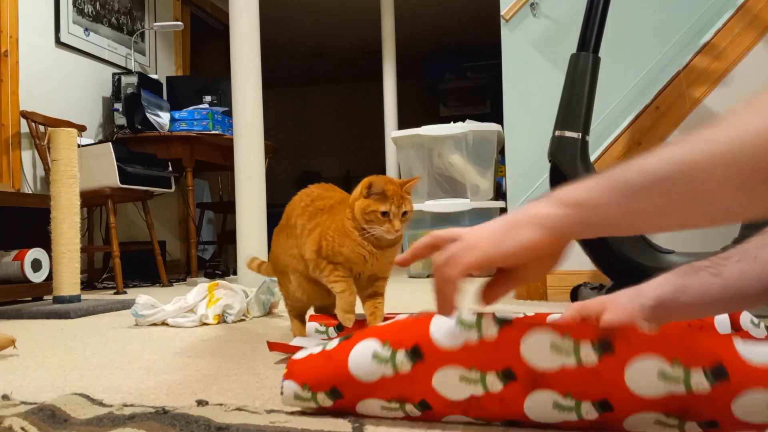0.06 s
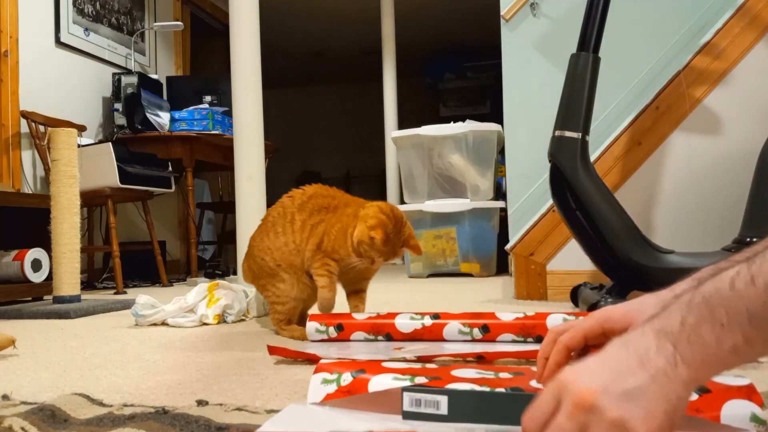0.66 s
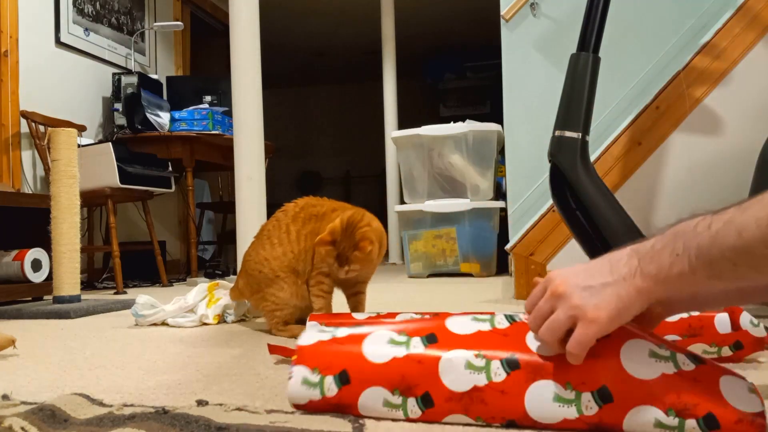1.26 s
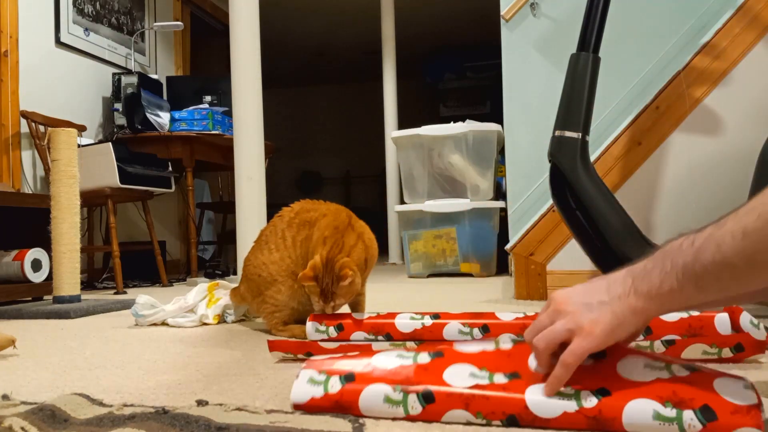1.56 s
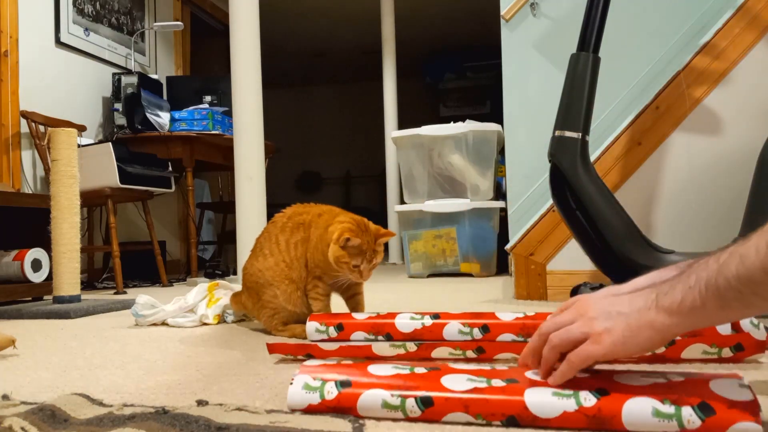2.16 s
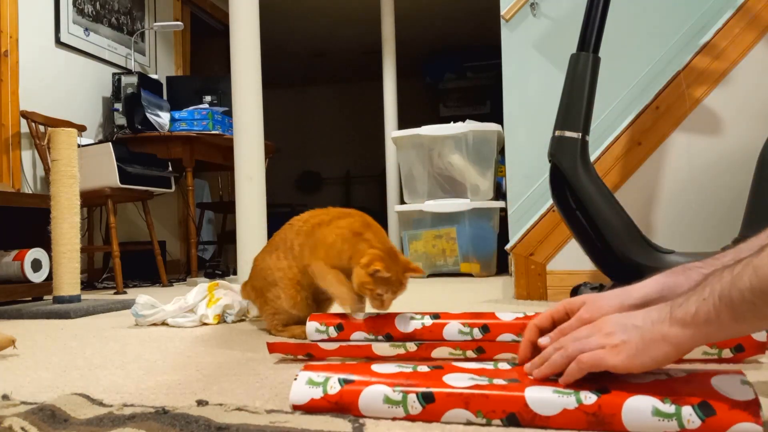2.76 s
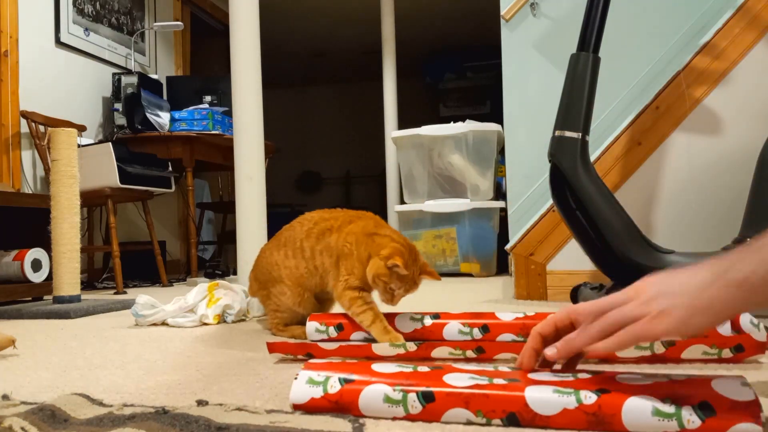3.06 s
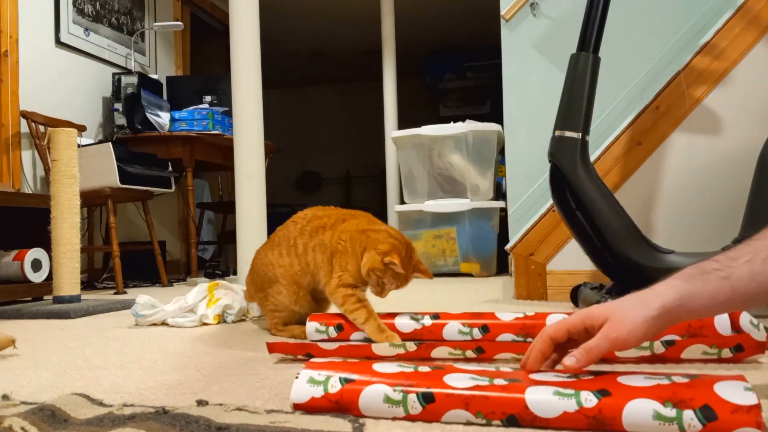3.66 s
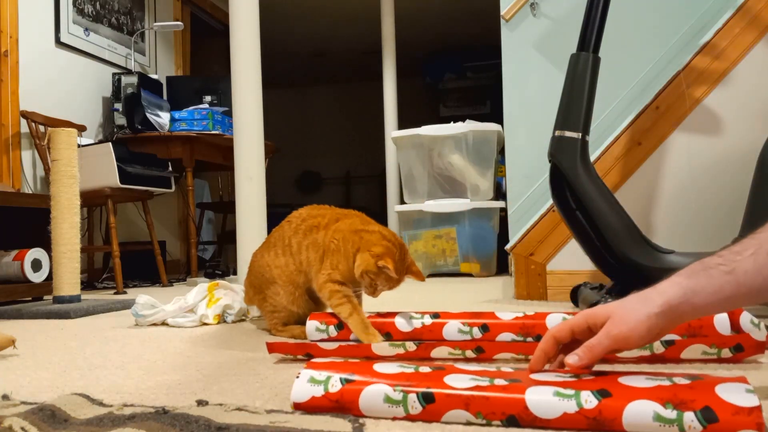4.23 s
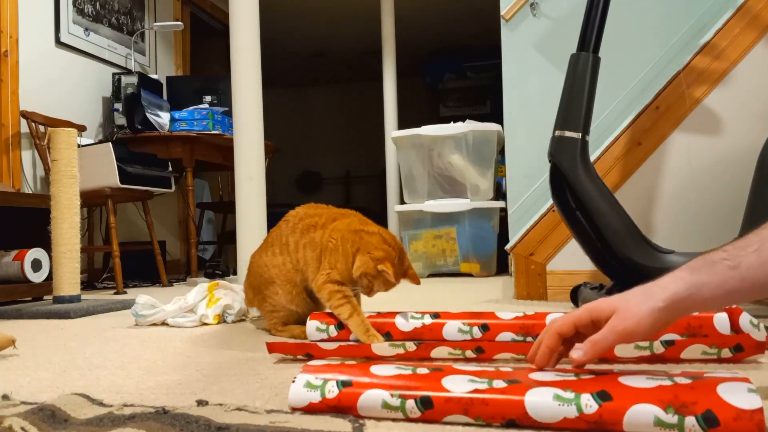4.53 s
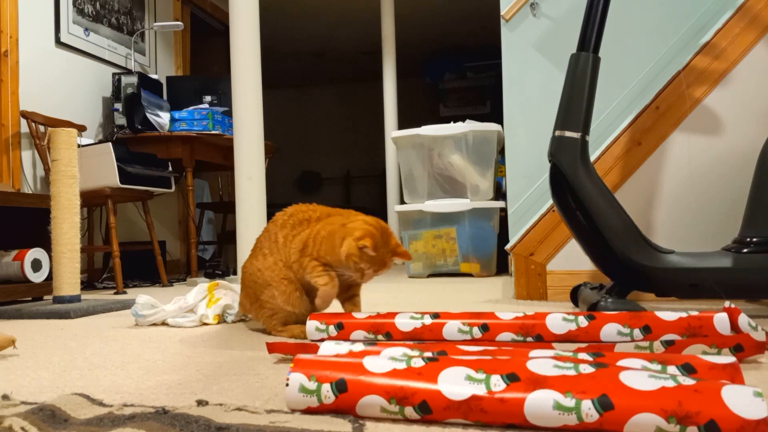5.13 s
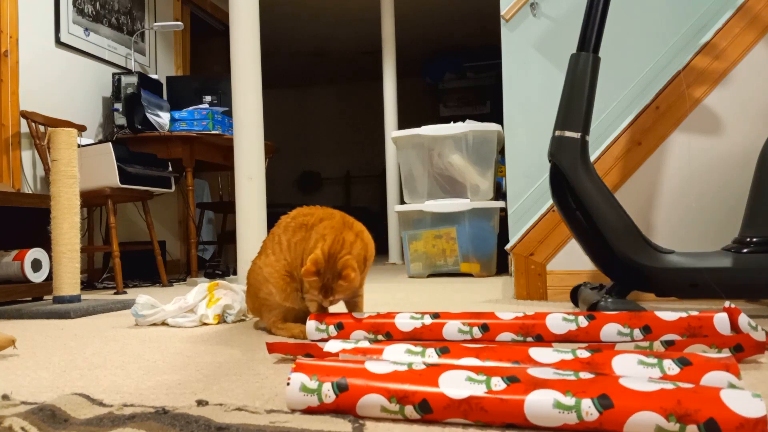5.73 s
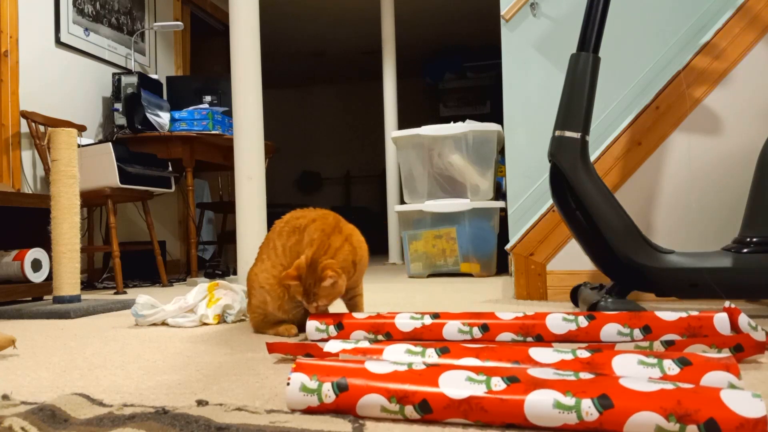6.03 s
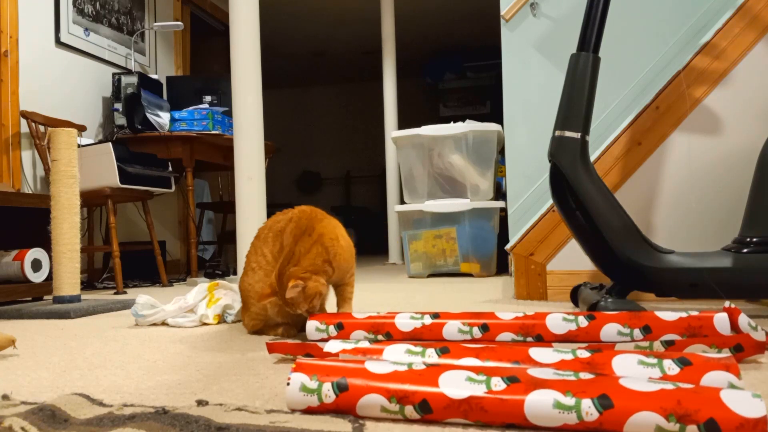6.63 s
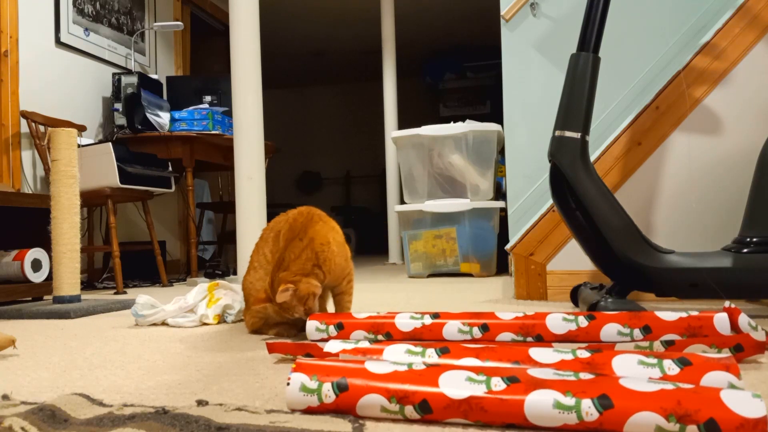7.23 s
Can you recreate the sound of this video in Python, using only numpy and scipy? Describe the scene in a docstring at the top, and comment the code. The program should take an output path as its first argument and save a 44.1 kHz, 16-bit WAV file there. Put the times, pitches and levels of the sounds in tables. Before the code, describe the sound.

Wrapping paper rustles, slides and crackles close by as hands handle the rolls, then a cat bites the paper with small sharp crunches.

```python
"""A quiet basement room, where rolls of wrapping paper are pushed about on a carpet, close by. The sheet rubs,
hisses and crinkles as it slides, and snaps as it buckles. Fingers scrape and knock on the hollow rolls, and
shifting weight thuds softly in the floor. A cat, a little farther off, claws at the end of a roll and, as the
hands glide off, bites the paper and the curled edge rings."""
import sys
import numpy as np
from scipy import signal
from scipy.fft import rfft, irfft, next_fast_len
from scipy.io import wavfile
from scipy.ndimage import map_coordinates

SR = 44100
rng = np.random.default_rng(int(sys.argv[2]) if len(sys.argv) > 2 else 0)


def to_wav(sig):
    """Store sig (one row per channel, or 1-D mono) as 16-bit WAV at the path in sys.argv[1].

    Samples outside -1..1 are clipped; the rate is SR.
    """
    pcm = np.clip(np.atleast_2d(sig), -1, 1) * 32767
    pcm = np.round(pcm).astype(np.int16)
    wavfile.write(sys.argv[1], SR, pcm.T)  # frames by channels


N = 330300
TIME = np.arange(N) / SR
HIT = np.arange(16384) / SR  # time axis of a single hit, s

# teeth and claws crease the paper: start_s, crease_db, crackle_db, curl_pitch_hz
BITES = [(4.0666, -26, -44, 1940), (4.091, -13.5, -32.5, 2344), (4.0946, -22, -37.5, 2320),
         (5.7566, -17.5, -38, 3150), (5.8126, -12, -46, 2020), (5.9826, -27.5, -64, 3050),
         (6.004, -21.5, -70, 3050), (6.0806, -16, -46.5, 3090), (6.0934, -33, -39, 2710),
         (6.122, -30, -42, 3300), (6.1496, -29, -50.5, 3040), (6.1917, -55, -50, 3070),
         (6.6703, -42, -56, 2800), (6.979, -8, -41.5, 3100), (7.0434, -16, -39.5, 2820)]
# resonances of the open roll: frequency_hz, level_db
ROLL_SPECTRUM = [(300, -9), (700, -8), (1600, -22), (1950, -3), (2350, -8.5), (2850, 0), (3400, -6),
                 (4100, -9), (5500, -5.5), (9000, -15.5)]
# crack of a fold flipping: frequency_hz, level_db
CRACK_SPECTRUM = [(700, -26.5), (1200, -2), (1800, 3), (2600, 1.5), (4000, -0.5), (5800, -5.5), (7200, -7),
                  (11000, -40)]
# top-end hiss of glossy paper: frequency_hz, level_db
HISS_SPECTRUM = [(3500, -31.5), (6000, 0), (7600, 1), (8600, -3), (10500, -2.5), (13000, -2), (16000, -5)]


def amp(db):
    """Decibels to gain."""
    return 10 ** (np.asarray(db) / 20)


def unit(x):
    """Scale to rms 1."""
    return x / np.sqrt(np.mean(x ** 2) + 1e-20)


def unit_attack(x, span_s):
    """Scale a hit so that its first span_s has rms 1."""
    return x / np.sqrt(np.mean(x[..., HIT < span_s] ** 2) + 1e-20)


def along(points, hz):
    """Read (frequency_hz, value) points on a log axis."""
    frequencies, values = np.transpose(points)
    return np.interp(np.log(hz + 1), np.log(frequencies + 1), values)


def wobble(knots_per_s):
    """A smooth random curve."""
    knots = rng.standard_normal(int(N * knots_per_s / SR) + 4)
    return map_coordinates(knots, [TIME * knots_per_s])


def filtered(x, response):
    """Zero-phase EQ; response gives the gain at each frequency."""
    n = x.shape[-1]
    size = next_fast_len(n + 4096, True)
    return irfft(rfft(x, size) * response(np.fft.rfftfreq(size, 1 / SR)), size)[..., :n]


def coloured(x, spectrum):
    """Minimum-phase EQ for hits: nothing rings ahead of the attack."""
    n = 2 * len(HIT)
    cepstrum = irfft(np.log(amp(along(spectrum, np.fft.rfftfreq(n, 1 / SR)))))
    cepstrum[1:n // 2] *= 2
    cepstrum[n // 2:] = 0
    return irfft(rfft(x, n) * np.exp(rfft(cepstrum)))[..., :len(HIT)]


def stereo_noise(size):
    """Noise that is narrow in the bass and wide in the treble."""
    # likeness of left and right: frequency_hz, correlation
    likeness = [(40, 0.96), (100, 0.44), (220, 1), (400, 0.79), (700, 0.79), (1300, 0.35), (2400, 0.042)]

    def mid_side_gains(hz):
        angle = np.arccos(np.clip(along(likeness, hz), -1, 1)) / 2
        return np.array([np.cos(angle), np.sin(angle)])

    mid, side = filtered(rng.standard_normal((2, size)), mid_side_gains)
    return np.array([mid + side, mid - side])


def panned(x, pan_db):
    """Tip the balance; negative leans right."""
    return x * amp([[pan_db / 2], [-pan_db / 2]])


def add(track, start_s, sound):
    """Mix a sound in at start_s."""
    part = track[:, max(round(start_s * SR), 0):][:, :sound.shape[-1]]
    part += sound[:, :part.shape[-1]]


def strike(decay_s, rise_s):
    """A percussive envelope."""
    return np.exp(-HIT / decay_s) * (1 - np.exp(-HIT / rise_s))


def scatter(build_s):
    """A lumpy tail from paper, floor and walls builds up, then dies by band; energy 1."""
    # decay of the room: frequency_hz, t60_s
    room_decay = [(200, 0.27), (1000, 0.19), (4000, 0.26), (10000, 0.18), (16000, 0.067)]
    hz, t, bands = signal.stft(stereo_noise(len(HIT)), SR, nperseg=256)
    lumps = amp(2.5 * rng.standard_normal(len(t)) + 2 * rng.standard_normal((len(hz), 1)))
    decay = amp(-60 * t / along(room_decay, hz)[:, None])
    tail = signal.istft(bands * lumps * decay, SR, nperseg=256)[1][:, :len(HIT)]
    return unit(tail * (1 - np.exp(-HIT / build_s))) / np.sqrt(len(HIT))


def burst(decay_s, rise_s):
    """A fold flips over in an uneven spray of bending waves; energy 1."""
    spikes = np.exp(.5 * rng.standard_normal(len(HIT)))
    return unit(stereo_noise(len(HIT)) * spikes * strike(decay_s, rise_s)) / np.sqrt(len(HIT))


def friction(spectrum, slips_per_s, grain_db, flutter_db):
    """A fluttering rub, grainy with tiny slips of random size; rms 1."""
    slips = (rng.random(N) < slips_per_s / SR) * rng.exponential(size=N)
    power = signal.lfilter([1], [1, -np.exp(-1 / (0.0007 * SR))], slips ** 2)
    grain = np.sqrt(1 + amp(grain_db) ** 2 * power / power.mean())
    rub = stereo_noise(N) * grain * amp(flutter_db * wobble(45))
    return unit(filtered(rub, lambda hz: amp(along(spectrum, hz))))


def strokes(contacts, q):
    """Soft contacts swell and fade in a broad resonance of floor or roll."""
    out = np.zeros((2, N))
    for peak_s, level_db, pitch_hz, width_s in contacts:
        noise = stereo_noise(len(HIT))
        tone = filtered(noise, lambda hz: 1 / (1 + (q * (hz / pitch_hz - pitch_hz / (hz + 1))) ** 2))
        swell = np.exp(-.5 * ((HIT - HIT.mean()) / width_s) ** 2)
        add(out, peak_s - HIT.mean(), amp(level_db) * unit(tone * swell) * np.sqrt(np.mean(swell ** 2)))
    return out


def hand_speed(peak_s, rise_s, fall_ratio, shape):
    """A hand gathers pace and slows again; shape 1 is a pointed swell, 2 a rounded one."""
    from_peak = np.maximum(peak_s - TIME, (TIME - peak_s) / fall_ratio) / rise_s
    return np.exp(-.5 * np.minimum(from_peak, 10) ** shape)


def noise_floor():
    """Faint steady rumble and hiss of the microphones, unrelated left and right."""
    # self-noise of the microphones: frequency_hz, level_db
    noise_spectrum = [(20, -16), (48, -15), (78, 3), (110, 2), (170, -5), (310, -2.5), (450, -9),
                      (1100, -16), (3000, -21), (6000, -26), (8800, -34.5), (12000, -25.5), (16000, -25)]
    bed = filtered(rng.standard_normal((2, N)), lambda hz: amp(along(noise_spectrum, hz)))
    return amp(-52) * panned(unit(bed), -0.67)


def floor_thuds():
    """Padded pushes boom in the floor, with a narrow stereo image."""
    # weight shifts on the floor: peak_s, level_db, pitch_hz, width_s
    thuds = [(.5, -42.5, 111, 0.064), (1.458, -50.5, 98, 0.12), (1.68, -58, 86, 0.028),
             (1.998, -52, 128, 0.056), (2.55, -41, 214, 0.028), (2.944, -39.5, 246, 0.01),
             (3.225, -41.5, 218, 0.027), (3.655, -38, 116, 0.034), (3.715, -39, 96, 0.064),
             (4.345, -46.5, 110, 0.018), (5.457, -51.5, 107, 0.042), (6.13, -46, 86, 0.046),
             (6.708, -46, 85.4, 0.051)]
    boom = strokes(thuds, q=2.2)
    return panned(.5 * (boom + boom.mean(0)), -2.5)


def roll_scrapes():
    """Each scrape sounds the cavity under the paper."""
    # fingers and paws on the hollow roll: peak_s, level_db, pitch_hz, width_s
    scrapes = [(.46, -41, 1360, 0.028), (1.04, -49, 1210, 0.082), (1.68, -36.5, 1640, 0.036),
               (2.0, -46, 890, 0.027), (2.385, -45, 1180, 0.011), (2.46, -42, 1780, .048),
               (2.54, -43, 1330, 0.012), (2.895, -43, 905, 0.02), (4.44, -49.5, 920, .018),
               (4.74, -44, 1340, 0.036), (4.94, -47.5, 840, .11), (5.33, -42, 1120, 0.023),
               (5.64, -53, 890, 0.022)]
    return panned(strokes(scrapes, q=1.3), -1.2)


def sheet_slide():
    """The sheet drags over carpet, fingers and itself: shoves sway and crinkle it, glides mostly hiss."""
    # hands shove the sheet along: peak_s, rise_s, rub_db, sway_db
    shoves = [(.05, 0.035, -53.5, -51), (.28, 0.057, -51, -47), (0.442, 0.056, -39.5, -41.5),
              (.87, 0.097, -49.5, -49), (1.08, 0.11, -53, -48.5), (1.29, .025, -55.5, -47),
              (1.48, .045, -41.5, -34.5), (1.672, 0.043, -34.5, -31), (1.8, 0.073, -46, -46),
              (1.99, 0.057, -40.5, -36.5), (2.32, 0.068, -41, -42.5), (2.54, 0.058, -44.5, -40),
              (2.69, 0.029, -35.5, -39), (2.82, 0.046, -50.5, -46), (2.93, 0.086, -47, -46.5),
              (3.11, 0.057, -55, -52.5), (3.21, 0.023, -34, -39.5), (3.921, 0.032, -47, -45.5),
              (4.1, 0.038, -46.5, -55), (4.37, 0.082, -59, -51.5), (4.73, 0.048, -56, -48),
              (5.36, 0.062, -49, -55.5)]
    # skin glides over the gloss: peak_s, rise_s, hiss_db
    glides = [(.22, .015, -53), (.7, .07, -60.5), (1.59, 0.039, -44), (1.96, 0.039, -40.5),
              (2.29, .05, -47), (2.48, 0.037, -43), (2.83, 0.041, -49.5), (3.16, .025, -49.5),
              (3.5, 0.061, -47), (3.75, .04, -56.5), (3.88, 0.045, -50), (4.29, 0.081, -47.5),
              (4.52, 0.056, -53.5), (4.88, 0.13, -44.5), (5.22, 0.14, -49)]
    # low body of the dragged sheet: frequency_hz, level_db
    sway_spectrum = [(40, -20), (90, -4.5), (180, -6.5), (300, 1), (450, -9), (800, -4), (1300, -15),
                     (2200, -38), (4000, -45)]
    # rasp of rubbed paper: frequency_hz, level_db
    rub_spectrum = [(700, -5), (1200, 2.5), (1700, 6), (3000, 5), (5500, 2), (7500, -17.5), (11000, -25)]
    shove, shove_sway, glide = np.zeros((3, N))  # envelopes, summed in power
    for peak_s, rise_s, rub_db, sway_db in shoves:
        speed = hand_speed(peak_s, rise_s, fall_ratio=1, shape=1.82)
        shove = np.hypot(shove, amp(rub_db) * speed)
        shove_sway = np.hypot(shove_sway, amp(sway_db) * speed)
    for peak_s, rise_s, hiss_db in glides:
        speed = hand_speed(peak_s, rise_s, fall_ratio=0.99, shape=1.63)
        glide = np.hypot(glide, amp(hiss_db) * speed)
    sway_gain = np.hypot(shove_sway, amp(-10) * glide)
    rub_gain = amp(-4.5) * np.hypot(shove, amp(1.5) * glide)
    hiss_gain = amp(-1) * np.hypot(glide, amp(-9) * shove)
    sway = sway_gain * friction(sway_spectrum, slips_per_s=100, grain_db=-3.5, flutter_db=3.5)
    rub = rub_gain * friction(rub_spectrum, slips_per_s=150, grain_db=-14.5, flutter_db=2)
    hiss = hiss_gain * friction(HISS_SPECTRUM, slips_per_s=400, grain_db=-17, flutter_db=1)
    crinkle = amp(-14) * shove * friction(CRACK_SPECTRUM, slips_per_s=55, grain_db=14, flutter_db=2.5)
    return panned(sway + rub + hiss + crinkle, -1.2)


def sheet_snaps():
    """A buckle flaps the sheet, cracks along the fold and ticks at its tip; tight folds tick the most."""
    # the sheet buckles: start_s, level_db, brightness_db (below 0 a wide, slack fold), rattle_db
    buckles = [(0.0446, -56, -16, -1.5), (0.1428, -55, -13, 1.5), (0.2237, -49.5, 2, 2),
               (0.2645, -48.5, -3, -4), (0.3525, -40, -1, 4.5), (0.4649, -43.5, -1, -1),
               (0.5828, -60, 7.5, -1), (.7954, -49.5, -7.5, 0), (0.8625, -54.5, -16, -8),
               (0.8965, -46.5, -9, 1.5), (0.9232, -50, -12.5, -10), (.943, -47.5, -8, -3),
               (1.0038, -49, -9.5, -5), (1.0311, -39, -8.5, -2), (1.092, -44, 0, 0), (1.4098, -46, -10, 16),
               (1.4299, -36.5, 5, -0.5), (1.4609, -39.5, -8, -11), (1.6482, -32.5, 3, 1),
               (1.6721, -40.5, -7, 1), (1.702, -35.5, 4.5, -3.5), (1.7544, -53.5, 17, -2),
               (1.9503, -45, -11, 2), (1.9563, -44.5, 12, 2), (1.9864, -40.5, 3.5, 1),
               (2.0207, -48.5, -14, 0), (2.118, -57, -10, -13), (2.2098, -56, -11.5, 6),
               (2.2435, -46.5, -4.5, -6), (2.278, -40, 1, -2.5), (2.2859, -39, -1.5, 2),
               (2.4198, -37.5, -1, -2.5), (2.5733, -44.5, -6.5, -4), (2.675, -34, 3, -4.5),
               (2.694, -39.5, -6.5, -5), (2.8326, -40, 3.5, 3), (3.0198, -33.5, 2.5, -1.5),
               (3.1926, -34.5, 6.5, -4), (3.332, -44.5, -1, 15), (3.514, -47, -5, 1),
               (3.686, -46.5, -4, 11), (4.3432, -49, -4.5, -3), (4.48, -52.5, -3.5, 1),
               (4.6909, -53, -6, -13), (4.9, -51, -6.5, -1), (5.2881, -43, 2, 0.5), (5.3134, -47, -1, 1)]
    # flap of the buckling sheet: frequency_hz, level_db
    flap_spectrum = [(40, -57), (90, 1), (160, -5.5), (290, 0), (450, -7), (700, -1.5), (1000, -3),
                     (1500, -7), (2100, -11.5), (4000, -64)]
    resonance_hz = np.geomspace(200, 16000, 36)
    out = np.zeros((2, N))
    for start_s, level_db, brightness_db, rattle_db in buckles:
        pan_db = -3 - 3 * rng.normal()  # folds are scattered along the roll
        rattle = amp(rattle_db) * scatter(build_s=0.0019)
        sharp = panned(burst(decay_s=.0015, rise_s=.0006), pan_db - 1.5) + amp(-1) * rattle
        slow = panned(burst(decay_s=0.003, rise_s=0.00013), pan_db / 2) + amp(-3) * rattle
        # every fold has chance resonances of its own
        ripple_db = 3.2 * rng.standard_normal(len(resonance_hz))
        sharp, slow = coloured(np.array([sharp, slow]), np.column_stack([resonance_hz, ripple_db]))
        flap = amp(level_db - brightness_db) * unit_attack(coloured(slow, flap_spectrum), 0.015)
        crack = amp(level_db + 3) * unit_attack(coloured(sharp, CRACK_SPECTRUM), 0.015)
        tick = amp(level_db + brightness_db) * unit_attack(coloured(sharp, HISS_SPECTRUM), 0.015)
        add(out, start_s, flap + crack + tick)
    return out


def finger_knocks():
    """A paper-wrapped tube gives a few damped cycles, a dry crack and a low bump against the carpet."""
    # fingers knock on a roll: start_s, tock_db, pitch_hz, crack_db
    knocks = [(1.0937, -10, 1270, -39.5), (1.149, -17, 800, -39), (1.2418, -9, 794, -39),
              (1.262, -20.5, 745, -41.5), (1.3086, -22.5, 1233, -50.5), (1.495, -22, 382, -41),
              (1.5064, -26, 427, -43), (1.8026, -19.5, 820, -40.5), (2.5381, -25.5, 605, -69),
              (3.2211, -24, 594, -40.5), (3.9148, -33.5, 422, -54.5), (3.9591, -34.5, 450, -57.5)]
    # dry crack of the tube: frequency_hz, level_db
    tube_spectrum = [(60, -6), (250, 6.5), (600, 6), (1300, 3), (2200, -3), (3500, -6.5),
                     (7500, -12.5), (9000, -17.5), (16000, -19.5)]
    left_lag_s = .00014
    out = np.zeros((2, N))
    for start_s, tock_db, pitch_hz, crack_db in knocks:
        tock = amp(tock_db + 2) * np.sin(2 * np.pi * pitch_hz * HIT) * strike(1.06 / pitch_hz, 0.00023)
        bump_hz = 270 * amp(rng.normal())
        bump = amp(crack_db + 10) * np.sin(2 * np.pi * bump_hz * HIT) * strike(0.0053, 0.00061)
        body = tock + bump
        stereo_body = np.array([np.interp(HIT - left_lag_s, HIT, body), body])
        impact = burst(decay_s=0.0062, rise_s=0.00022) + amp(-2) * scatter(build_s=0.00075)
        crack = amp(crack_db + 6) * unit_attack(coloured(impact, tube_spectrum), 0.029)
        add(out, start_s, panned(stereo_body, -2.5) + panned(crack, -0.75))
    return out


def bite_crumple():
    """Tiny folds keep giving way after each of the cat's bites."""
    rise_s = 0.013
    power = np.zeros(N)
    for start_s, _, crackle_db, _ in BITES:
        age = np.maximum(TIME - start_s, 0) / rise_s
        power += (amp(crackle_db - 12.5) * age * np.exp(1 - age)) ** 2
    folds = friction(ROLL_SPECTRUM, slips_per_s=250, grain_db=4, flutter_db=6.5)
    return panned(np.sqrt(power) * folds, -4)


def cat_bites():
    """Small bright creases ring the curled edge and the open end of the roll, and carry into the room."""
    # a sharp new crease: frequency_hz, level_db
    crease_spectrum = [(600, -26), (2000, -14.5), (4200, -5.5), (5500, -9.5), (6800, -2), (7900, 1),
                       (8400, -12), (9100, -7), (10200, -1), (12000, -4), (16000, -4)]
    # modes of the curled edge: pitch_ratio, level_db, t60_s
    curl_modes = [(1, -2.5, 0.12), (1.52, 1, 0.084)]
    left_lag_s = 0.00033
    ring_s = np.maximum(HIT - np.array([[left_lag_s], [0]]), 0)
    out = np.zeros((2, N))
    for start_s, crease_db, crackle_db, pitch_hz in BITES:
        direct = panned(burst(decay_s=.0017, rise_s=.0005), -8)
        bite = direct + amp(-.3) * panned(scatter(build_s=.002), -2)
        crease = amp(crease_db - 15.5) * unit_attack(coloured(bite, crease_spectrum), 0.0037)
        crackle = amp(crackle_db - 2.5) * unit_attack(coloured(bite, ROLL_SPECTRUM), 0.015)
        curl = sum(amp(mode_db - 60 * ring_s / t60_s) * np.sin(2 * np.pi * pitch_hz * ratio * ring_s)
                   for ratio, mode_db, t60_s in curl_modes)
        add(out, start_s, crease + crackle + amp(crackle_db - 3) * panned(curl, -1))
    return out


def scene():
    """Hands, paper and cat over a faint noise floor."""
    background = noise_floor() + floor_thuds()
    handling = roll_scrapes() + sheet_slide() + sheet_snaps() + finger_knocks()
    return background + handling + bite_crumple() + cat_bites()


def record(dry):
    """The microphones thin the deepest bass and pass nothing above their band limit."""
    low_cut_hz, top_hz = 55, 15850
    return filtered(dry, lambda hz: (hz < top_hz) / np.sqrt(1 + (low_cut_hz / (hz + 1)) ** 4))


dry = scene()
out = record(dry)
to_wav(out)
```